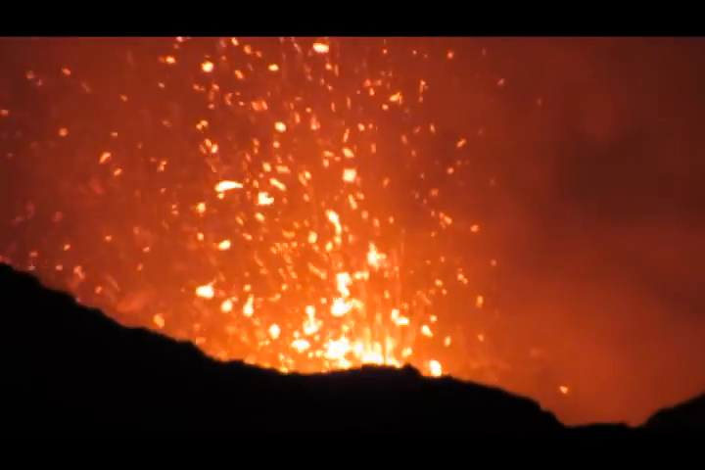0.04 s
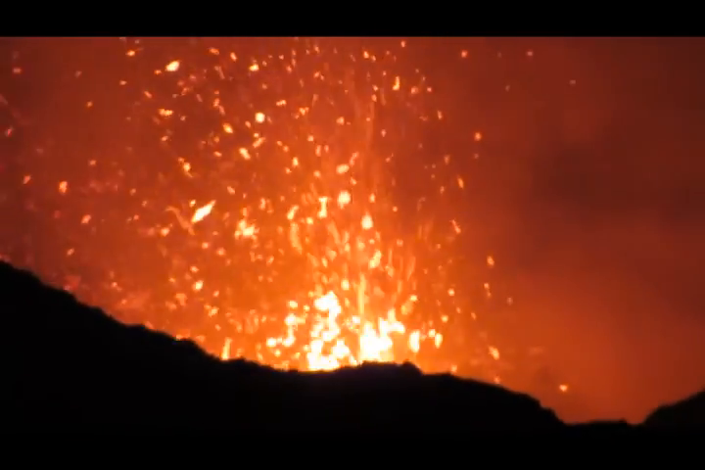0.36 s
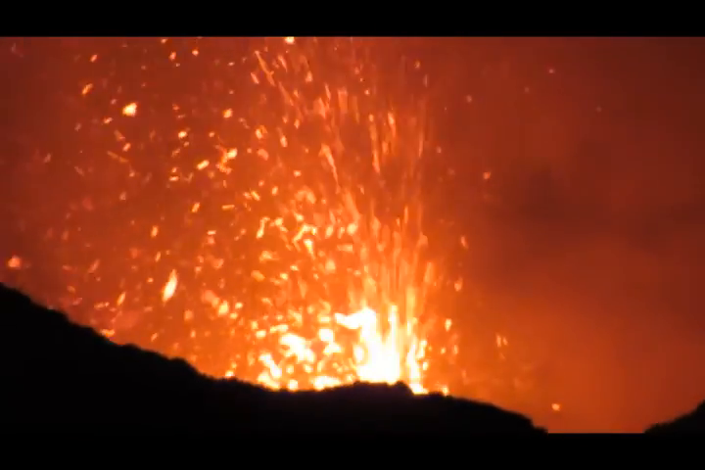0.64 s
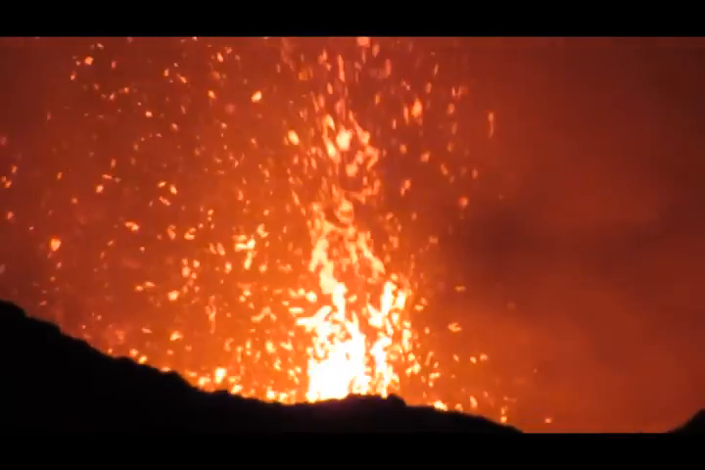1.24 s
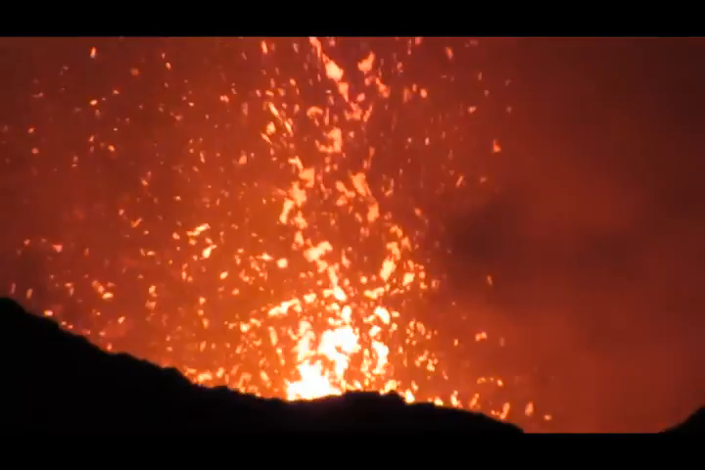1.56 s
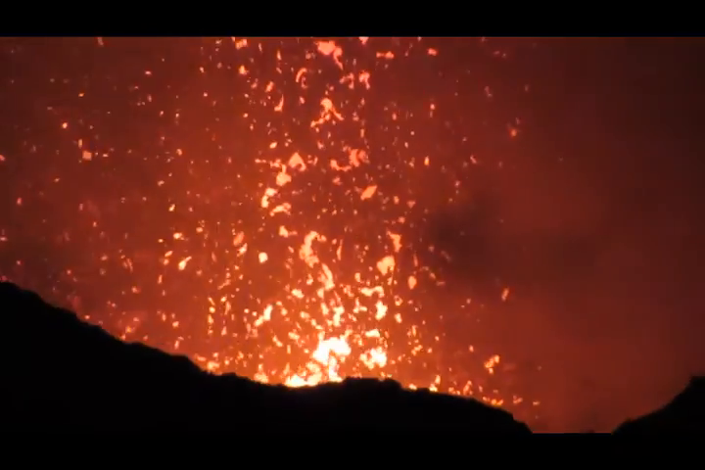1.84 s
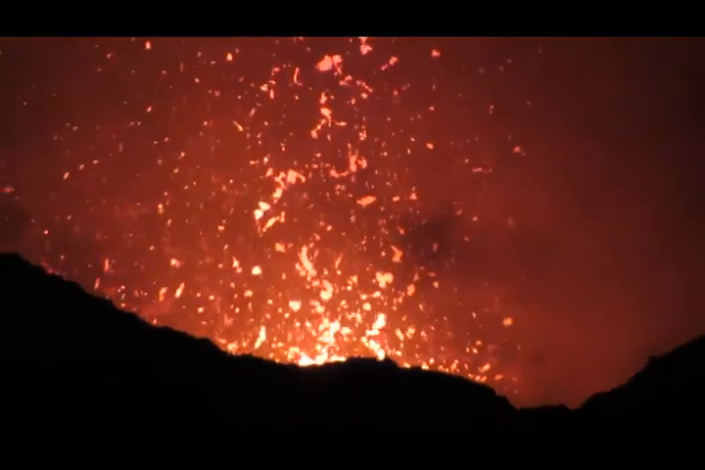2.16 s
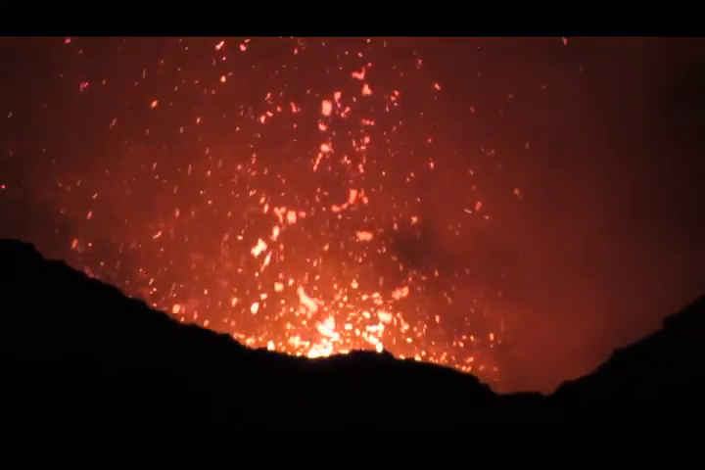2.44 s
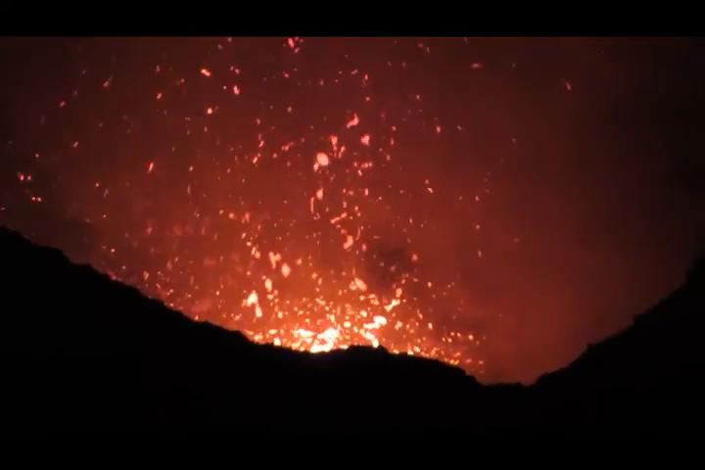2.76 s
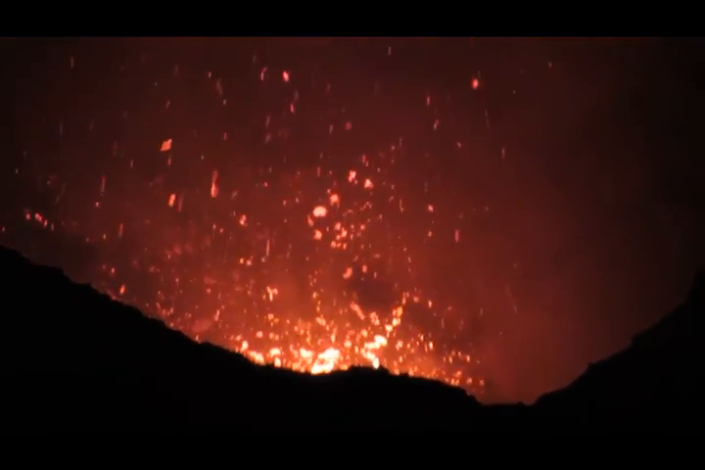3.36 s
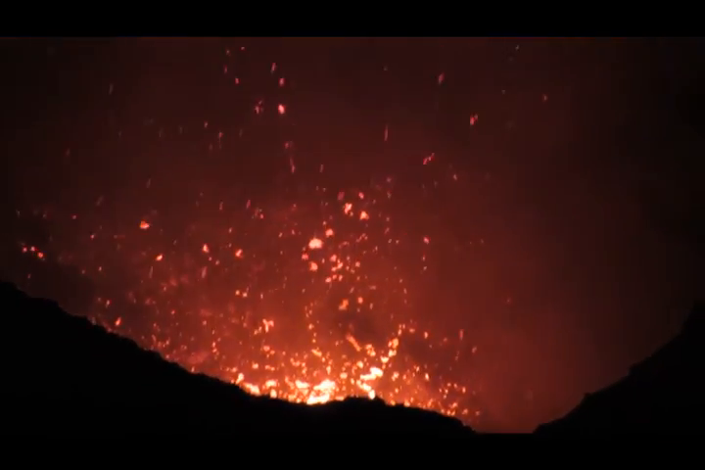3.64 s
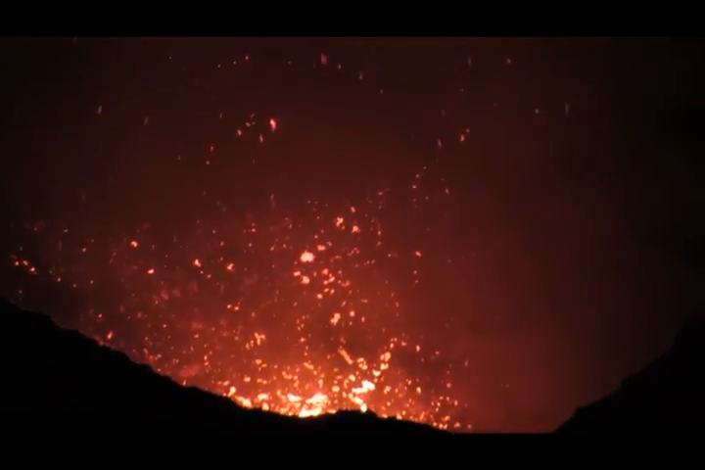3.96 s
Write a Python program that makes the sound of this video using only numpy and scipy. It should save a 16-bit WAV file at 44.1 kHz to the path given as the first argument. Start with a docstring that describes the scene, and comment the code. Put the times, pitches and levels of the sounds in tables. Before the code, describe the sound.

Erupting lava gives a surging, hissing roar outdoors, peaks and then fades far away. Close up and louder, gusty wind rumbles, pops and thumps against the microphone, with a small handling tick after the roar has dropped.

```python
"""Lava fountain in the wind

A gas jet roars and hisses by turbulent mixing, swells three times, then sinks to a far wash.
Wind on the crater rim rumbles in two microphone ports; its eddies strike them in crackling buffets.
Faint, very high chirps, perhaps of a bat, and small handling ticks sound close by in the night."""
import sys
import numpy as np
from scipy import signal
from scipy.fft import rfft, irfft
from scipy.io import wavfile
from scipy.ndimage import uniform_filter1d

SR = 44100
rng = np.random.default_rng(int(sys.argv[2]) if len(sys.argv) > 2 else 0)


def dump(signal):
    """Clip the signal to [-1, 1] and save it as 16-bit WAV at the path in sys.argv[1]."""
    limited = np.clip(np.atleast_2d(signal).T, -1, 1)
    pcm = np.round(limited * 32767).astype(np.int16)
    wavfile.write(sys.argv[1], SR, pcm)


N = 176400
EDDY_LOW_HZ, EDDY_HIGH_HZ = 554, 1526  # pitch range before any octave shift


def fountain():
    """Turbulent mixing: the jet's roar and hiss swell and flicker together over a steady wash."""
    # heard level of the roar and hiss, ducking briefly after the hardest buffets
    # (time [s], relative roar level [dB], relative hiss level [dB])
    heard_levels = [(0, -41, -50), (.52, -45, -54.5), (.785, -38, -46.5), (.85, -45, -61.5),
                    (1.1, -44.5, -56.5), (1.35, -35.5, -50.5), (1.55, -30, -43.5), (1.7, -43, -59),
                    (1.98, -54.5, -73), (2.5, -62, -74), (2.79, -76, -87), (3.0, -74.5, -82.5),
                    (4, -71, -79)]
    # spectra of roar, hiss and wash (frequency [Hz], relative density [dB])
    roar_spectrum = [(30, -11.5), (130, 3), (450, 3.5), (1400, -1.5), (2400, -1), (3200, -9.5), (4200, -25),
                     (10000, -86.5)]
    hiss_spectrum = [(1500, -23.5), (3000, 0), (5100, -1.5), (6200, -9.5), (7500, -20), (10500, -50.5),
                     (14000, -86)]
    wash_spectrum = [(110, 2.5), (500, -14.5), (1900, -25.5), (5000, -30.5), (10000, -32.5), (14000, -55.5)]
    roar = gas_noise(roar_spectrum) * amp(curve(heard_levels, column=1) + 5)
    hiss = gas_noise(hiss_spectrum) * amp(curve(heard_levels, column=2) + 2.5)
    flicker = amp(wander(hz=35))
    return (roar + hiss) * flicker + gas_noise(wash_spectrum) * amp(-70)


def gas_noise(spectrum, size=512):
    """Partial coherence: turbulent noise with drifting spectral patches differs between the ports."""
    # likeness of the ports (frequency [Hz], correlation before clipping to +-1)
    likeness = [(200, 2), (550, -0.5), (900, 0.86)]
    # balance of the ports (frequency [Hz], left minus right [dB])
    balance = [(400, -4), (5000, -2)]
    hz, hop = np.fft.rfftfreq(size, 1 / SR), size // 4
    a, b, c, d, patches = rng.standard_normal((5, len(hz), N // hop + 5))
    patches = uniform_filter1d(patches, size=7, axis=0)
    patch_db = unit(uniform_filter1d(patches, size=14, axis=1))
    correlation = np.clip(read(likeness, hz), -1, 1)[:, None]
    tilt = amp(read(balance, hz) / 2)[:, None]
    left = a + 1j * b
    right = correlation * left + np.sqrt(1 - correlation ** 2) * (c + 1j * d)
    frames = np.array([left * tilt, right / tilt]) * amp(read(spectrum, hz)[:, None] + patch_db)
    return unit(signal.istft(frames, nperseg=size, noverlap=size - hop)[1][:, :N])


def wind(left_share=.68, reference_db=-37):
    """Intermittent turbulence: clumps of rumble, nearly alike in both ports, and of lesser eddies."""
    # strength of the wind (time [s], relative level [dB])
    gusts = [(0, -32.5), (.23, -38.5), (.41, -30), (.46, -37), (.65, -39), (.79, -38), (1.1, -42),
             (1.4, -33.5), (1.6, -35.5), (1.73, -48.5), (1.86, -33.5), (2.1, -40), (2.55, -37.5),
             (2.61, -29), (2.84, -48.5), (2.92, -44), (3.02, -40), (3.24, -51), (3.4, -46.5), (3.53, -47.5),
             (3.6, -80), (3.73, -52.5), (3.85, -51.5), (3.93, -41.5), (4, -35)]
    # spectrum of the rumble (frequency [Hz], relative density [dB])
    spectrum = [(20, -33.5), (60, 3), (120, 10), (230, 2), (3500, -105)]
    # lesser eddies (rate [1/s], level at reference wind [dB], growth [dB/dB], pitch shift [octaves])
    flutter = [(329, -35.5, 1.3, -1.94), (288.7, -34, 2.5, -0.51)]
    wind_db = curve(gusts)
    clump_db = 5.5 * np.clip(wander(hz=23.3), -2, 1)
    common = colour(rng.standard_normal(N), spectrum)
    common /= np.sqrt(abs(uniform_filter1d(common ** 2, size=1300)) + 1e-12)  # even out the envelope
    separate = colour(rng.standard_normal((2, N)), spectrum)
    out = (unit(common) + 0.083 * unit(separate)) * amp(wind_db - 0.5 + clump_db)
    share = np.array([[left_share], [1 - left_share]])
    excess_db = np.minimum(wind_db - reference_db, 2)
    for per_s, db, growth, octaves in flutter:
        pitches = eddy_pitches(octaves)
        shape = (len(pitches), 2, N)
        arrivals = rng.random(shape) < share * per_s / SR / len(pitches)
        kicks = arrivals * np.clip(rng.standard_normal(shape), -2, 2) * amp(clump_db)
        out += unit(eddies(kicks, pitches)) * amp(db + growth * excess_db)
    return out


def buffets(size=8192, count=64, eddies_per_s=430, spread_db=5.5):
    """Superposition: each buffet is a ragged volley of eddies; stronger volleys are pitched higher."""
    # wind buffets (start [s], length [s], relative level [dB], bias to the left port [dB])
    volleys = [(0.043, 0.029, -22.5, 12), (0.19, 0.01, -17.5, 7.5), (0.221, 0.042, -22, 6),
               (0.278, 0.013, -19.5, 7.5), (0.358, 0.01, -18.5, 12), (0.372, 0.072, -16.5, 5.5),
               (0.477, 0.14, -26, 1), (0.677, 0.023, -21.0, 7.5), (0.728, 0.012, -16.5, 10.0),
               (0.771, 0.093, -19.5, 2.5), (0.892, 0.046, -23, 7), (1.135, 0.038, -16.5, -1),
               (1.257, 0.068, -24.5, 7.5), (1.394, 0.028, -17, 18), (1.437, 0.0075, -13.5, 1.5),
               (1.463, 0.11, -21, 3), (1.595, 0.028, -19, 7.5), (1.764, 0.008, -21.5, -8),
               (1.845, 0.017, -25, 0), (1.907, 0.0074, -22.5, 3.5), (1.934, 0.028, -22.5, 12),
               (2.11, 0.032, -28, -3.5), (2.405, 0.00613, -23.5, 12), (2.417, 0.028, -30, 9.5),
               (2.505, 0.036, -19, 7.5), (2.587, 0.069, -16.5, 5.5), (2.661, 0.092, -24.5, 4.5),
               (2.8, 0.008, -35, 24), (2.913, 0.021, -22, 7.5), (2.98, 0.05, -25, 0),
               (3.099, 0.019, -30.5, 7.5), (3.172, 0.036, -35.5, -6), (3.396, 0.012, -31, -6)]
    out, lead = np.zeros((2, N)), size // 10
    golden = (np.sqrt(5) - 1) / 2  # this step deals eddies evenly between the ports
    for start, length, db, pan_db in volleys:
        jitter, side, sign = rng.random((3, count))
        clumps = unit(uniform_filter1d(rng.standard_normal(count), size=2))
        strength = amp(spread_db * np.minimum(clumps, 1))
        strength[0], jitter[0] = amp(spread_db / 2), 0  # a firm eddy leads
        pitches = eddy_pitches(octaves=0.04 * (db + 11))
        size_class = rng.random((count, len(pitches))).argsort(axis=1).ravel()
        n = int(np.clip(round(length * eddies_per_s), 2, count))
        k = np.arange(n)
        at = np.minimum(lead + ((k + jitter[:n]) / n * length * SR).astype(int), size - 1)
        port = ((k * golden + side[0]) % 1 > .5 + pan_db / 20).astype(int)
        kicks = np.zeros((len(pitches), 2, size))
        kicks[size_class[:n], port, at] = strength[:n] * np.sign(sign[:n] - .5)
        volley = unit(eddies(kicks, pitches)) * np.sqrt(length * SR / size)
        add(out, start - lead / SR - 1 / EDDY_HIGH_HZ, volley * amp(db - 1.5))
    return out


def snaps(size=2048):
    """Size sets pitch: lone eddies hit hard, small ones with a crack, large ones with a thump."""
    # hard eddies (time [s], peak [dB], pitch [Hz], left minus right before crosstalk [dB])
    strikes = [(0.247, -5, 970, 14), (0.733, -1, 1040, 13.5), (1.576, -7.5, 940, 1.5), (1.581, -6, 695, 15),
               (1.848, -5.5, 970, 18), (1.939, -4, 900, 12.5), (2.57, -18, 1320, 12),
               (2.588, -6.5, 1460, 28), (2.615, -11.5, 1900, 12), (2.642, -6, 1520, 23.5),
               (2.746, -5.5, 1300, 27), (2.852, -26, 800, -15), (2.896, -24, 950, -20),
               (2.924, -11.5, 1560, 26), (3.739, -27, 333, -8), (3.886, -19, 640, -16),
               (3.957, -9, 628, -11)]
    out = np.zeros((2, N))
    for time, db, hz, pan_db in strikes:
        kick = np.zeros((1, 2, size))
        kick[0, :, size // 2] = amp([pan_db / 2, -pan_db / 2])
        pulse = eddies(kick, [hz])
        height = abs(pulse).max(axis=0)
        add(out, time - height.argmax() / SR, amp(db) * pulse / height.max())
    return out


def eddies(kicks, pitches, leak_hz=224, treble_leak=0.17):
    """Convolution and crosstalk: kicks (size class, port, sample) become pulses heard at both ports."""
    n = kicks.shape[-1]
    hz = np.fft.rfftfreq(n, 1 / SR)
    direct = sum(rfft(part) * eddy(hz, pitch) for part, pitch in zip(kicks, pitches))
    bass = 1 / (1 + (hz / leak_hz) ** 4)
    leak = bass + 1j * treble_leak * (1 - bass)  # all the bass crosses, and some treble in quadrature
    return irfft((direct + leak * direct[::-1]) / np.sqrt(1 + abs(leak) ** 2), n)


def eddy(hz, pitch_hz, q=1.145, port_hz=2850):
    """Damped oscillation: the unit-energy spectrum of a two-cycle wavelet, dulled by the port."""
    s, p = 1j * hz / pitch_hz, 1j * hz / port_hz
    wavelet = s / (1 + s / q + s ** 2) ** 2
    smoothing = np.exp(-(abs(s) / 6) ** 2)  # little remains above six times the pitch
    port_loss = (1 + p + p ** 2) * (1 + p)
    shape = wavelet * smoothing / port_loss
    return shape / np.sqrt(np.mean(abs(shape) ** 2))


def eddy_pitches(octaves, count=5):
    """Inverse scaling of pitch with size: from large, low eddies to small, high ones."""
    return np.linspace(EDDY_LOW_HZ, EDDY_HIGH_HZ, count) * 2 ** octaves


def handling(size=4096, rise_s=0.0006, decay_s=0.0015, scuff_s=0.03):
    """Impact and friction: sharp ticks on the camera's shell by the right port, then a soft scuff."""
    # taps on the shell (time [s], relative level [dB])
    ticks = [(2.48, -33.5), (3.599, -65)]
    # spectrum of a tick (frequency [Hz], relative density [dB])
    spectrum = [(600, -27), (2000, 4), (8000, -3), (10800, 7), (16000, -20.5)]
    out, t = np.zeros((2, N)), np.arange(size) / SR
    envelope = 2 * np.minimum(t / rise_s, 1) * np.exp(-t / decay_s)
    for start, db in ticks:
        crack = unit(colour(rng.standard_normal(size), spectrum)) * envelope
        add(out, start, crack * amp(db) * amp([[-14], [0]]))
    rub = unit(colour(rng.standard_normal(size), [(700, -10), (5200, -9), (12000, -48)]))
    arch = np.sin(np.linspace(0, np.pi, int(scuff_s * SR)))
    add(out, start_s=3.657, sound=amp(-63) * rub[:len(arch)] * arch)
    return out


def chirps(length_s=0.02, base_hz=9230, fall_hz=2770, fall_s=0.01):
    """Frequency modulation: short whistles drop and level off, roughened by a wavering amplitude."""
    # high calls (time [s], level [dB])
    calls = [(.579, -72), (1.306, -75.5), (2.081, -71), (2.832, -71), (3.532, -68)]
    out, t = np.zeros(N), np.arange(int(length_s * SR)) / SR
    hz = base_hz + fall_hz * np.exp(-t / fall_s)
    call = np.sin(np.pi * t / length_s) * np.sin(2 * np.pi * np.cumsum(hz) / SR)
    for start, db in calls:
        add(out, start, amp(db) * call)
    return out * (1 + 0.55 * wander(hz=450))


def amp(db):
    """Decibels to amplitude ratio."""
    return 10 ** (np.asarray(db) / 20)


def unit(x):
    """Normalisation to an rms of one."""
    return x / np.sqrt(np.mean(x ** 2) + 1e-24)


def read(points, hz):
    """Interpolation of a table on a log-frequency axis."""
    f, value = np.transpose(points)
    return np.interp(np.log(hz + 1), np.log(f + 1), value)


def curve(table, column=1):
    """Linear interpolation of one column of a time table, per sample."""
    rows = np.array(table)
    return np.interp(np.arange(N) / SR, rows[:, 0], rows[:, column])


def colour(x, points):
    """Zero-phase filtering by a table of (frequency [Hz], gain [dB])."""
    n = x.shape[-1]
    return irfft(rfft(x) * amp(read(points, np.fft.rfftfreq(n, 1 / SR))), n)


def wander(hz):
    """Random fluctuation: low-pass noise of unit rms."""
    f = np.fft.rfftfreq(N, 1 / SR)
    return unit(irfft(rfft(rng.standard_normal(N)) / (1 + (f / hz) ** 4), N))


def add(mix, start_s, sound):
    """Superposition of a sound on the mix at a given time."""
    at = round(start_s * SR)
    sound = sound[..., max(-at, 0):]
    part = mix[..., max(at, 0):][..., :sound.shape[-1]]
    part += sound[..., :part.shape[-1]]


def scene():
    """Pressures add: the fountain behind the wind and the small near sounds."""
    return fountain() + wind() + buffets() + snaps() + chirps() + handling()


def record(dry, overload_db=-2, edge_hz=15700):
    """Soft saturation: the hardest eddies overload the microphones; a low-pass limits the band."""
    limited = dry / (1 + (dry / amp(overload_db)) ** 4) ** (1 / 4)
    low_pass = signal.firwin(511, edge_hz, window=("kaiser", 9), fs=SR)
    return signal.oaconvolve(limited, low_pass[None], "same")


dry = scene()
out = record(dry)
dump(out)
```